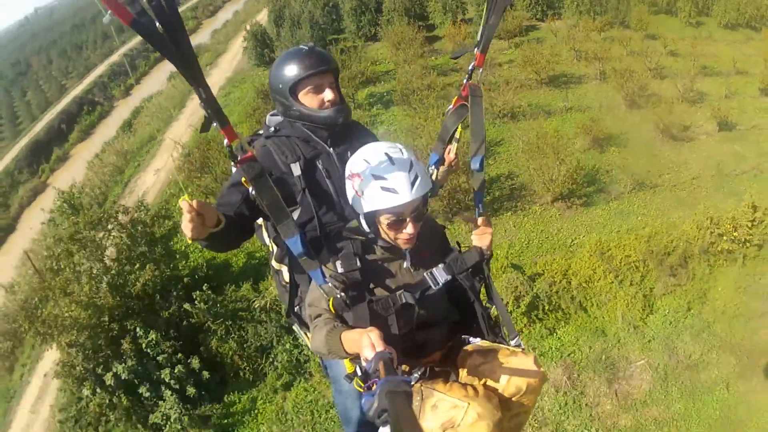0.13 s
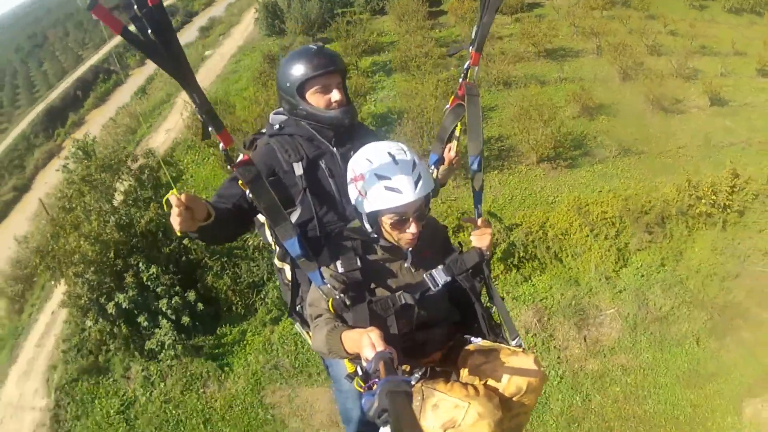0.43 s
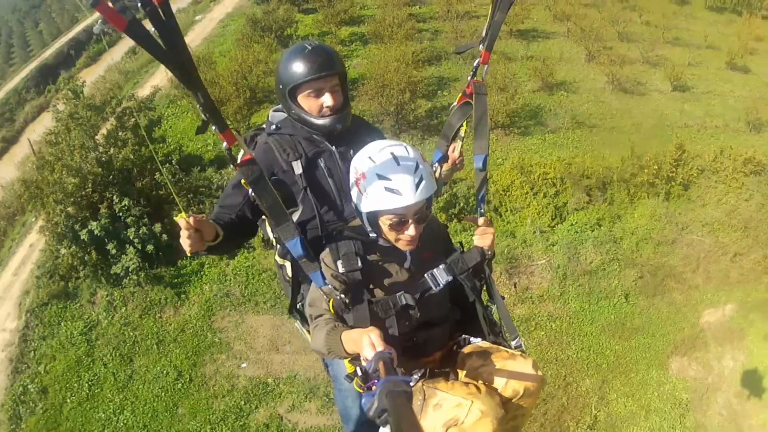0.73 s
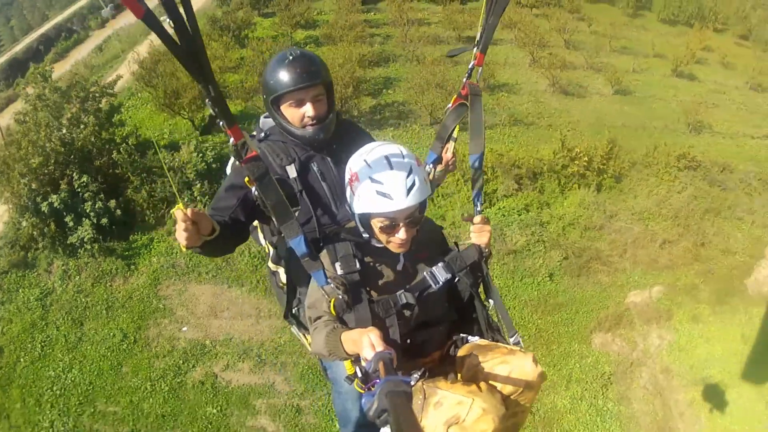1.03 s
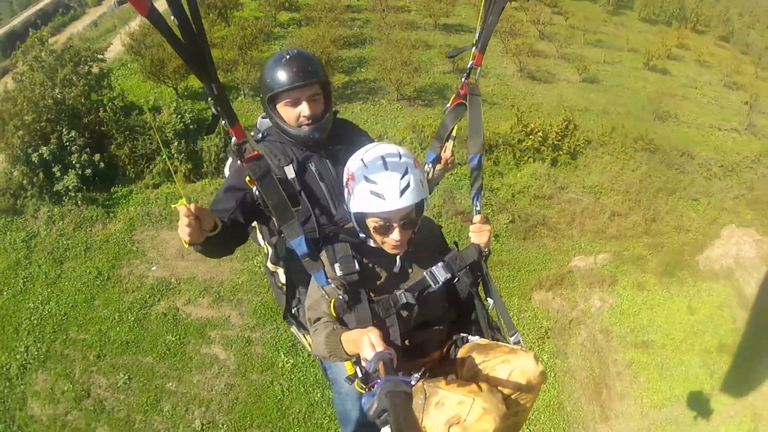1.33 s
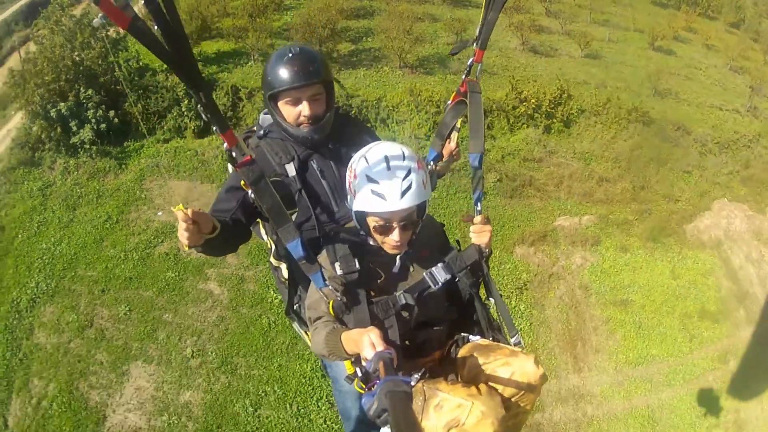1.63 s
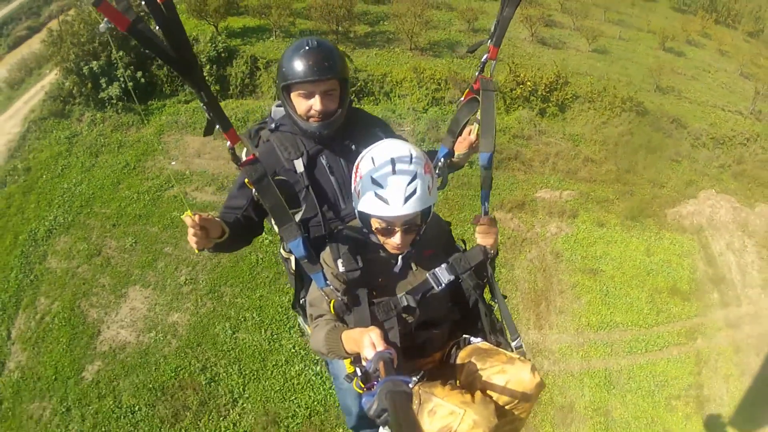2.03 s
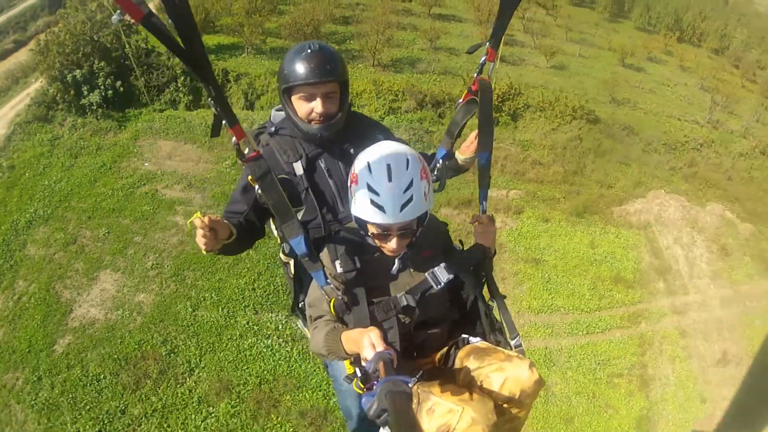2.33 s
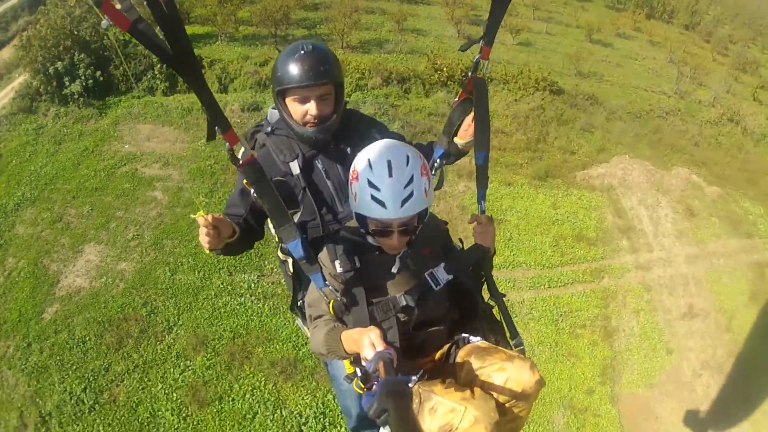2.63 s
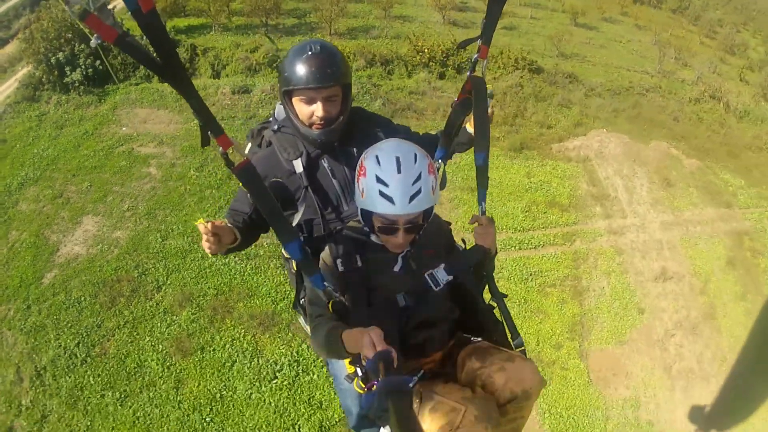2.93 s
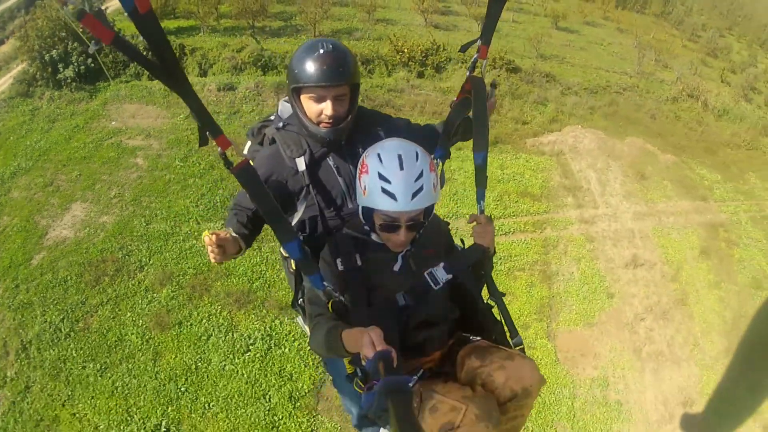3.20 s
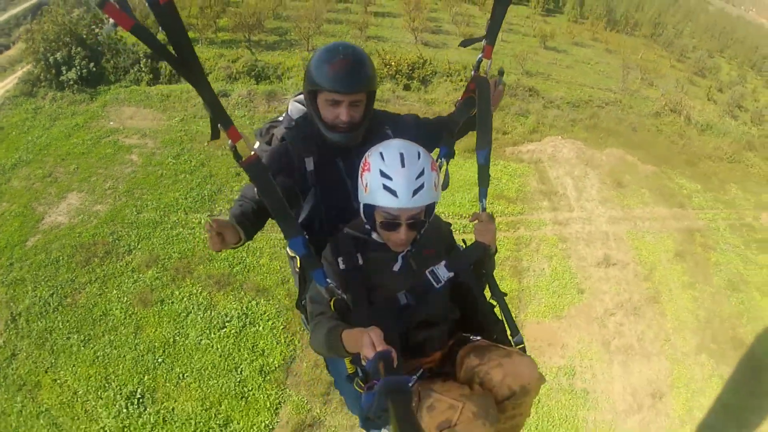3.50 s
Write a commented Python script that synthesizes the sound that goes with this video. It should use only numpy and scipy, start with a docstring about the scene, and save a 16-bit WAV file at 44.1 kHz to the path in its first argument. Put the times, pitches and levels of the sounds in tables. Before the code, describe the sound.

A low rumble of wind on the microphone, with two knocks and a small click.

```python
"""Wind on a paraglider's pole camera

Air streams past a camera held out on a pole in flight. Turbulence on the housing makes a dull roar over
low buffeting, topped by a rough rush and a faint hiss; it all eases as the airflow drops. A few big eddies
boom, two hard buffets crack on the microphone, and a dry click comes with a brief rattle of thin ticks."""
import sys
import numpy as np
from scipy.fft import rfft, irfft, next_fast_len
from scipy.io import wavfile
from scipy.ndimage import uniform_filter1d, minimum_filter1d, map_coordinates

SR = 44100
rng = np.random.default_rng(int(sys.argv[2]) if len(sys.argv) > 2 else 0)


def store_wav(level_fs):
    """Save 16-bit WAV to argv[1]."""
    pcm = np.round(np.clip(np.atleast_2d(level_fs), -1, 1) * 32767)
    wavfile.write(sys.argv[1], SR, pcm.T.astype(np.int16))


N = 161406

# fader ride of the roar, before its trim (time [s], level [dB])
ROAR_RIDE = [(0, -10), (0.14, -16), (0.46, -13.5), (0.57, -17), (0.67, -14), (0.8, -16), (1.17, -15.5),
             (1.32, -16), (1.62, -16.5), (1.74, -14), (1.86, -17.5), (2.04, -17), (2.22, -18.5),
             (2.55, -18), (2.65, -15.5), (2.77, -17.5), (2.86, -19.5), (3.03, -16), (3.18, -17.5),
             (3.45, -21), (3.66, -21)]
# fader ride of the low buffeting (time [s], level [dB])
BUFFET_RIDE = [(0, -16), (0.12, -14.5), (0.22, -18.5), (0.4, -13.5), (0.5, -14), (0.79, -13.5), (0.87, -17),
               (0.95, -13.5), (1.2, -15), (1.3, -13), (1.42, -16.5), (1.87, -15), (2.1, -14.5),
               (2.22, -19.5), (2.65, -18.5), (3.08, -16.5), (3.19, -18), (3.66, -17)]
# strength of the fast airflow; drives the rush, the hiss and the roar's brightness (time [s], level [dB])
AIRFLOW = [(0, -35.5), (0.16, -37), (0.5, -33.5), (0.78, -38.5), (0.87, -35.5), (0.97, -39), (1.24, -37),
           (1.38, -33.5), (1.72, -34.5), (1.85, -38), (2.24, -42.5), (2.56, -42.5), (2.66, -40), (2.8, -40),
           (2.9, -42), (3.01, -39), (3.3, -43), (3.66, -44)]
# dull low-mid tone of the roar (frequency [Hz], relative level [dB])
ROAR_EQ = [(40, -20), (140, -10), (270, 2), (400, 1), (550, -1.5), (680, -6), (790, -16.5), (920, -25.5),
           (1300, -47), (2500, -86.5), (5000, -120)]
# bass weight of the buffeting (frequency [Hz], relative level [dB])
BUFFET_EQ = [(15, -22.5), (28, -17), (48, -3.5), (75, -3), (110, -0.5), (160, 1), (230, -1), (330, -12),
             (600, -34.5), (1200, -88.5), (4000, -120)]
# midrange tone of the rush (frequency [Hz], relative level [dB])
RUSH_EQ = [(400, -22), (800, 1.5), (1050, -1.5), (1400, -7), (1950, -11), (2500, -18.5), (3300, -24),
           (4600, -29), (5300, -85.5)]
# twin treble peaks of the hiss (frequency [Hz], relative level [dB])
HISS_EQ = [(1500, -21), (2800, -2), (3600, 13.5), (4100, 2), (4650, 13), (5100, -41.5), (9000, -57)]
# big eddies that boom (time [s], pitch [Hz], level [dB])
BOOM_CUES = [(.12, 260.3, -15), (.46, 310, -12.5), (.79, 176.4, -11.5), (.95, 149.4, -10.5),
             (1.27, 197.4, -16), (2.1, 169.7, -15)]
# hard buffets on the microphone (time [s], body level [dB])
THUMP_CUES = [(0.6407, -7.5), (0.8742, -6)]
# thin ticks around the click (time [s], level before the low cut [dB])
TICK_CUES = [(1.8973, -17.5), (1.9293, -23), (1.9453, -30)]

ROAR_TRIM_DB, RUSH_TRIM_DB = 0.5, -1.5
ROAR_BRIGHTEN = .011  # share by which the roar's frequencies rise per dB of flow
BOOM_WIDTH_S, BOOM_WANDER = .03, .12  # wander is a share of the pitch
THUMP_WIDTH_S, CRACK_WIDTH_S, CRACK_DB = .00053, .00015, -11.5  # crack level against the thump's body
CLICK_S, CLICK_DB, CLICK_DECAY_S, CLICK_HIGH_CUT_HZ = 1.9133, -9.5, .0012, 12000
TICK_LOW_CUT_HZ, RUSTLE_DB, RUSTLE_WIDTH_S = 4700, -55.5, .019
HISS_DB, HISS_GROWTH = -57, 0.55  # level at mean flow; dB gained per dB of flow
SIZZLE_DB, SIZZLE_GROWTH, SIZZLE_HZ, SIZZLE_WIDTH_HZ = -65.5, 2, 10135, 300
MASTER_HIGH_CUT_HZ = 10700


def roar(gust_db):
    """Small eddies on the housing make a dull roar that brightens as the flow picks up."""
    read_position = np.cumsum(1 + ROAR_BRIGHTEN * gust_db)  # faster reading lifts the whole spectrum
    eddies = map_coordinates(noise(ROAR_EQ, size=2 * N), [read_position])
    return amp(ROAR_TRIM_DB + curve(ROAR_RIDE)) * eddies * flutter(rate=70, depth_db=0.88)


def buffeting():
    """Large eddies push on the housing and give the wind its low end."""
    return amp(curve(BUFFET_RIDE)) * noise(BUFFET_EQ)


def booms():
    """Each big eddy swells and throbs briefly at a wandering pitch."""
    out = np.zeros(N)
    for time_s, hz, db in BOOM_CUES:
        cycles = np.cumsum(hz * (1 + BOOM_WANDER * wobble(rate=80))) / SR
        out += amp(db) * swell(time_s, BOOM_WIDTH_S) * np.sin(2 * np.pi * cycles)
    return out


def thumps():
    """Each hard buffet is one short suction with a cracking crest and a rebound on either side."""
    t = np.arange(N) / SR
    out = np.zeros(N)
    for time_s, db in THUMP_CUES:
        for width_s, gain in [(THUMP_WIDTH_S, 1), (CRACK_WIDTH_S, amp(CRACK_DB))]:
            offset = (t - time_s) / width_s
            out -= amp(db) * gain * (1 - offset ** 2) * np.exp(-offset ** 2 / 2)
    return out


def click():
    """A dry click: a sudden step that leaks away without ringing."""
    age_s = np.arange(N) / SR - CLICK_S
    step = (age_s >= 0) * np.exp(-np.abs(age_s) / CLICK_DECAY_S)
    return -amp(CLICK_DB) * filtered(step, lambda hz: 1 / (1 + 1j * hz / CLICK_HIGH_CUT_HZ))


def ticks():
    """Thin ticks just before and after the click, over a soft rustle; a steep low cut leaves only treble."""
    centre_s = np.mean(TICK_CUES, axis=0)[0]
    out = amp(RUSTLE_DB) * swell(centre_s, RUSTLE_WIDTH_S) * rng.standard_normal(N)
    for time_s, db in TICK_CUES:
        out[round(time_s * SR)] += amp(db)
    return filtered(out, lambda hz: 1 - np.exp(-(hz / TICK_LOW_CUT_HZ) ** 8))


def rush(flow_db):
    """Fast airflow lays a rough rush in the band just above the roar."""
    return amp(RUSH_TRIM_DB + flow_db) * noise(RUSH_EQ) * flutter(rate=140, depth_db=1.5)


def hiss(gust_db):
    """A faint hiss of air and a thin sizzle far above it; both grow with the flow."""
    white = rng.standard_normal(N)
    high_band = unit(filtered(white, lambda hz: np.exp(-.5 * ((hz - SIZZLE_HZ) / SIZZLE_WIDTH_HZ) ** 2)))
    air = amp(HISS_DB + HISS_GROWTH * gust_db) * noise(HISS_EQ) * flutter(rate=22, depth_db=1.75)
    sizzle = amp(SIZZLE_DB + SIZZLE_GROWTH * gust_db) * high_band * flutter(rate=11, depth_db=4.0)
    return air + sizzle


def amp(db):
    """Decibels to gain."""
    return 10 ** (np.asarray(db) / 20)


def unit(x):
    """Scale to rms 1."""
    return x / np.sqrt(np.mean(x ** 2) + 1e-20)


def curve(rows):
    """An automation line, one value per sample, from (time [s], level [dB]) rows."""
    return np.interp(np.arange(N) / SR, *np.transpose(rows))


def swell(time_s, width_s):
    """A bell-shaped fade in and out around time_s."""
    return np.exp(-.5 * ((np.arange(N) / SR - time_s) / width_s) ** 2)


def wobble(rate):
    """Smooth random modulation with `rate` points a second."""
    return map_coordinates(rng.standard_normal(size=2048), [np.arange(N) * rate / SR], mode="wrap")


def flutter(rate, depth_db):
    """Quick random gain of rms 1 from passing eddies."""
    return unit(amp(depth_db * wobble(rate)))


def filtered(x, response):
    """Equalise x with a gain given as a function of frequency."""
    padded = next_fast_len(len(x) + 8192)
    return irfft(rfft(x, padded) * response(np.fft.rfftfreq(padded, 1 / SR)), padded)[:len(x)]


def noise(eq, size=N):
    """Noise of rms 1, coloured by (frequency [Hz], relative level [dB]) rows."""
    points_hz, db = np.transpose(eq)
    white = rng.standard_normal(size)
    return unit(filtered(white, lambda hz: amp(np.interp(np.log(hz + 1), np.log(points_hz), db))))


def scene():
    """Wind, with one dry click and a few thin ticks around it."""
    flow_db = curve(AIRFLOW)
    gust_db = flow_db - flow_db.mean()
    wind = buffeting() + booms() + roar(gust_db) + rush(flow_db) + hiss(gust_db) + thumps()
    return (wind + click() + ticks())[None]


def record(dry):
    """A fast limiter holds the gusts to full scale, then a brick-wall high cut takes off the top."""
    window = 177  # samples, 4 ms
    needed_gain = 1 / np.maximum(1, np.abs(dry[0]))
    smooth_gain = uniform_filter1d(minimum_filter1d(needed_gain, size=window), size=window)
    return filtered(dry[0] * smooth_gain, lambda hz: hz < MASTER_HIGH_CUT_HZ)[None]


dry = scene()
out = record(dry)
store_wav(out)
```